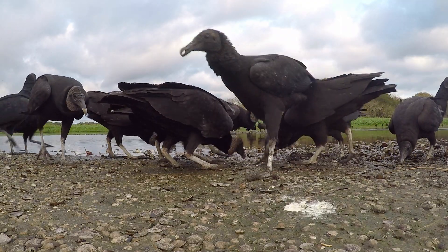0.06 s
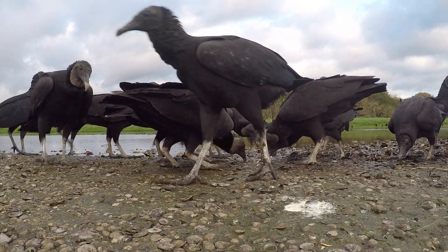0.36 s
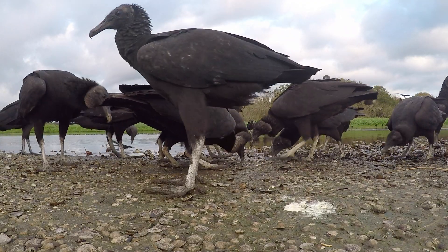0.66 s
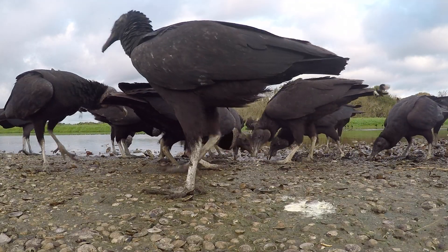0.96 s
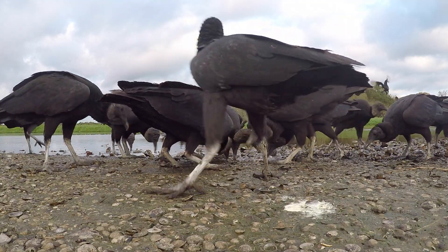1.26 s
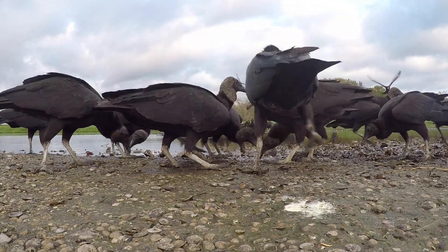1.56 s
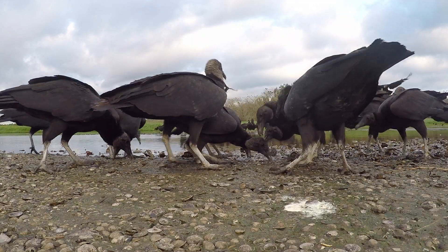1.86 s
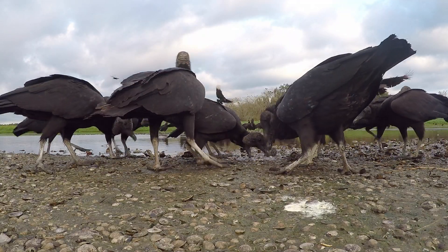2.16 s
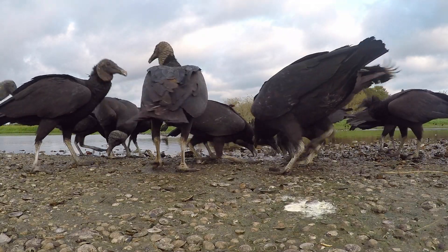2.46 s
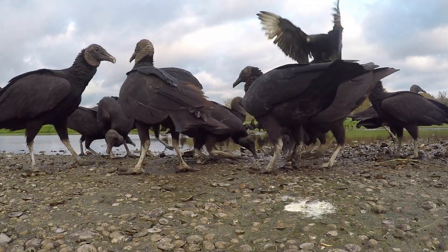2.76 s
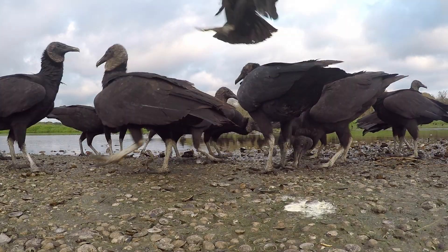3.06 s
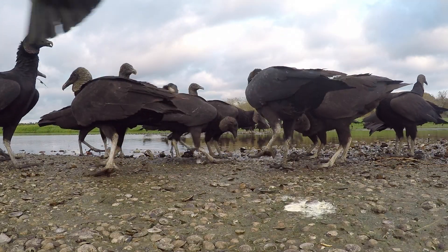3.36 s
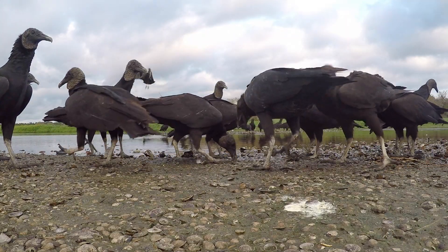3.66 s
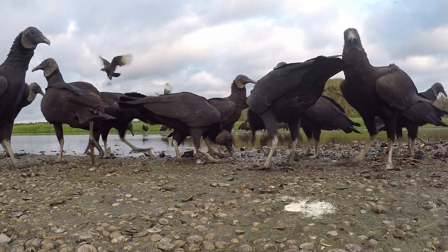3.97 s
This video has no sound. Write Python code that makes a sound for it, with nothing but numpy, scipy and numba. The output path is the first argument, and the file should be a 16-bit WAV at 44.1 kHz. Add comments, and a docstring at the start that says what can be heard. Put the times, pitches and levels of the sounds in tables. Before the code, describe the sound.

A vulture gives one loud, hoarse hiss close by, from about 3.4 seconds to 4. Before that, low wind rumbles while feathers swish, feet scuff in wet grit and beaks tick on pebbles. A bird grunts faintly further off at 0.5 seconds and again from 1 to 2. Around 2.6 to 3.3 seconds, wings rustle overhead and puff air onto the microphone, with sharper stone clicks near 3.

```python
"""A muddy, pebbly shore, where black vultures feed around a small camera on the ground.
Wind rumbles, feathers swish, feet scuff in grit, and beaks and claws tick on stones.
One bird grunts further off, and one flaps overhead, pushing air onto the microphone.
Then a close bird gives one hoarse hiss: fluttering breath makes its windpipe and throat ring."""
import sys
import numpy as np
from scipy import signal
from scipy.fft import rfft, irfft
from scipy.io import wavfile
from scipy.ndimage import uniform_filter1d, map_coordinates
from numba import njit

SR = 44100
rng = np.random.default_rng(int(sys.argv[2]) if len(sys.argv) > 2 else 0)


def wrap_up_sound(samples):
    """Save the sound to the file named by the first command line argument, as 16-bit audio."""
    columns = np.atleast_2d(samples).T
    # keep every value between -1 and 1, then stretch to whole-number steps
    tamed = np.clip(columns, -1, 1)
    steps = np.round(tamed * 32767).astype(np.int16)
    wavfile.write(sys.argv[1], SR, steps)


N = 176400
T = np.arange(N) / SR

# how strong the wind is from low to high pitch: f/Hz, level/dB
WIND_COLOUR = [(12, -5.5), (25, 1.5), (70, 1.5), (120, -6.5), (220, -13.5), (550, -27), (1050, -23.5),
               (1450, -39.5), (2200, -31.5), (2800, -48.5), (4700, -35), (8000, -58), (12500, -49.5),
               (15500, -62)]
# feather swishes and soft footfalls: t/s, length/s, level/dB, f/Hz
SWISHES = [(0.0, 0.083, -35.5, 465), (.6, 0.037, -43, 650), (.8, 0.083, -48.5, 650),
           (1.048, 0.041, -36.5, 550), (1.495, 0.033, -38, 225), (2.665, 0.059, -39, 374),
           (2.73, 0.039, -27, 218), (2.935, 0.053, -39.5, 575), (3.0, 0.038, -32, 295),
           (3.16, 0.14, -36, 490)]
# tone colour of the stony ground: f/Hz, level/dB
STONE_COLOUR = [(150, -22.5), (500, 5.5), (1050, 5.5), (1450, -3.5), (2400, 0), (4600, 2.5), (6700, -2.5),
                (8000, -16), (12000, -16.5), (15500, -31)]
# feet and beaks scuffing in grit: t/s, length/s, level/dB, f/Hz
SCUFFS = [(.05, 0.15, -45, 3850), (.245, 0.049, -45, 4420), (.42, 0.085, -45.5, 4300),
          (.608, 0.036, -34, 3830), (1.215, 0.038, -45.5, 2010), (1.295, 0.048, -45.5, 4650),
          (1.365, 0.024, -37.5, 5030), (1.485, 0.07, -47, 5000), (1.545, 0.032, -35.5, 5450),
          (1.672, 0.05, -42, 5330), (1.727, 0.023, -42, 1350), (1.775, 0.12, -48, 4400),
          (2.065, 0.091, -45, 4300), (2.294, 0.021, -44.5, 4150), (2.42, 0.031, -40.5, 2100),
          (2.459, 0.022, -36.5, 2620), (2.54, 0.041, -37, 3480), (2.585, 0.029, -35, 5730),
          (2.691, 0.016, -27, 5240), (2.726, 0.011, -32, 5100), (2.84, 0.021, -34.5, 4250),
          (2.959, .027, -28, 4560), (2.962, 0.026, -30.5, 2240), (2.987, 0.036, -37, 4800),
          (3.03, 0.026, -31.5, 4400), (3.078, 0.019, -35.5, 4400), (3.139, 0.02, -42, 4930)]
# beaks and claws hitting stones: t/s, level/dB, f/Hz
TICKS = [(.059, -27, 4840), (.174, -23.5, 4830), (.234, -25, 4700), (.266, -29.5, 3560),
         (.331, -28.5, 1940), (.542, -28, 2330), (.5925, -18, 4350), (.652, -26.5, 3640), (.703, -29, 4480),
         (.858, -33, 4570), (1.049, -20.5, 3580), (1.1155, -22.5, 2980), (1.1435, -26, 4760),
         (1.29, -21.5, 4230), (1.307, -23.5, 4450), (1.344, -26.5, 3930), (1.366, -25.5, 2800),
         (1.389, -25, 4460), (1.5, -24, 1040), (1.565, -20, 2390), (1.627, -26, 910), (1.689, -20, 3740),
         (1.7305, -20, 1090), (1.892, -29, 4200), (1.949, -27, 4400), (1.983, -25.5, 5800),
         (2.047, -25, 4860), (2.146, -24, 3500), (2.1675, -25.5, 4270), (2.295, -21.5, 3870),
         (2.463, -22, 2530), (2.4865, -16, 3720), (2.5015, -22, 6140), (2.565, -17.5, 990),
         (2.6215, -18.5, 5700), (2.6965, -22, 4580), (2.9862, -18.5, 6800), (2.9895, -4.5, 4730),
         (3.028, -19, 6350), (3.0328, -14.5, 4200), (3.0455, -14, 4900), (3.141, -18, 960),
         (3.297, -23.5, 1660), (3.612, -8, 2270), (3.76, -9.5, 3950)]
# two distant grunts, one short and rising, one long: t/s, level/dB, f/Hz
GRUNTS = [(.45, -58, 290), (.49, -37.5, 416), (.535, -66, 710), (.98, -70, 337), (1.1, -44, 358),
          (1.43, -41.5, 390), (1.62, -43, 376), (2.05, -48.5, 359), (2.4, -64, 328)]
# sharp, bright spits of mud: t/s, length/s, level/dB, f/Hz
SPITS = [(1.142, 0.0051, -37, 11200), (1.548, 0.035, -51.5, 11200), (3.555, 0.009, -36.5, 11500)]
# short wet squelches: t/s, length/s, level/dB, f/Hz
SQUELCHES = [(1.322, 0.027, -41.5, 1740), (2.238, 0.024, -40.5, 890), (2.828, 0.012, -33.5, 1165),
             (3.08, 0.02, -37, 940), (3.294, 0.013, -35, 1610)]
# feather rustle of the flying bird: t/s, level/dB
RUSTLE = [(2.3, -58.5), (2.6, -47.5), (2.9, -52), (3.02, -43.5), (3.12, -49), (3.19, -41.5), (3.35, -48)]
# puffs of air from wings: t/s, length/s, level/dB
GUSTS = [(2.62, 0.61, -33.5), (3.02, 0.078, -25), (3.13, 0.201, -26), (3.905, 0.2, -19.5)]
# tone colour of those puffs: f/Hz, level/dB
GUST_COLOUR = [(10, -6.5), (25, 0.5), (50, -9), (110, -15), (220, -23), (600, -75)]
# the windpipe ringing in the close hiss: t/s, level/dB, f/Hz
WINDPIPE = [(3.338, -52, 380), (3.36, -36, 400), (3.395, -21, 440), (3.47, -17.5, 470), (3.59, -17, 469),
            (3.66, -21, 432), (3.77, -23, 396), (3.87, -26, 443), (3.945, -29, 385), (3.985, -46, 366)]
# breath through the beak: t/s, level/dB, beak opening (0 narrow, 1 wide)
BREATH = [(3.34, -91.5, 0.1), (3.395, -40, 0), (3.43, -22.5, 0.46), (3.465, -18.5, 0.93), (3.6, -19, 0.96),
          (3.675, -17.5, 0.83), (3.72, -21, 0.36), (3.84, -23.5, 0.27), (3.925, -31, 0.12), (3.985, -60, 0)]
# pitches at which throat and beak ring: f/Hz, width/Hz, level/dB (beak narrow), level/dB (beak wide)
THROAT_BANDS = [(983, 240, -10.5, -14), (1215, 146, -12, -15), (1610, 290, -18, -12),
                (2367, 370, -7, -23.5), (2643, 140, -17, -20.5), (3230, 120, -27, -27.5),
                (3900, 410, -19.5, -12.5), (4700, 660, -7.5, -20), (4900, 620, -19, -2.5),
                (5320, 580, -13.5, -18), (6170, 690, -13, -24), (6700, 420, -23, -20.5)]
# the throat tightens, then slackens: t/s, factor on its pitches
THROAT_TUNING = [(3.41, 0.99), (3.66, 1.005), (3.95, 0.982)]
# tone colour of the hiss between those pitches: f/Hz, level/dB
AIR_COLOUR = [(60, 10.5), (200, 15), (700, -3), (2000, 0), (6800, -28), (7400, -8), (12500, -17),
              (15500, -34)]


def undb(db):
    """Turn decibels into a number to multiply by."""
    return 10 ** (np.asarray(db) / 20)


def unit(x):
    """Scale a signal so that its average size (rms) is 1."""
    return x / np.sqrt(np.mean(x ** 2) + 1e-18)


def noise():
    """White noise for the whole scene."""
    return rng.standard_normal(N)


def curve(rows):
    """Join each column of a table with straight lines over time; the end values hold."""
    rows = np.array(rows, float)
    return [np.interp(T, rows[:, 0], column) for column in rows.T[1:]]


def add(out, start, x):
    """Mix a sound in at its start time, in seconds."""
    i = int(np.clip(start * SR, 0, N))
    out[i:i + len(x)] += x[:N - i]


@njit
def band_pass(x, hz, width):
    """Let through a band of pitches whose centre and width can move."""
    out, band_state, low_state = np.empty(len(x)), 0., 0.
    for i in range(len(x)):
        step, damping = np.tan(np.pi * hz[i] / SR), width[i] / hz[i]
        band = (band_state + step * (x[i] + 1e-18 - low_state)) / (1 + step * (step + damping))
        band_state = 2 * band - band_state
        low_state += 2 * step * band
        out[i] = damping * band
    return out


def resonate(x, hz, width_hz):
    """Make a sound ring near one pitch by filtering it twice."""
    zeros = np.zeros(len(x))
    hz, width_hz = np.clip(hz + zeros, 20, 19000), width_hz + zeros
    return unit(band_pass(band_pass(x, hz, width_hz), hz, width_hz))


def colour(x, points):
    """Shape the lows and highs of a sound to follow a tone colour table."""
    hz, db = np.array(points, float).T
    all_hz = np.arange(N // 2 + 1) * SR / N + 1e-3
    gain = undb(np.interp(np.log(all_hz), np.log(hz), db))
    # these steps make the filter ring after a click, never before it
    cepstrum = irfft(np.log(gain), N)
    cepstrum[1:N // 2] *= 2
    cepstrum[N // 2 + 1:] = 0
    return unit(irfft(rfft(x) * np.exp(rfft(cepstrum)), N))


def wander(per_s):
    """Glide to a new random value per_s times a second."""
    hold = max(int(SR / per_s), 1)
    return unit(uniform_filter1d(noise()[np.arange(N) // hold], hold))


def clicks(per_s, spread_db):
    """Random clicks, many small and a few large."""
    hits = (rng.random(N) < per_s / SR) * np.sign(noise())
    return hits * undb(spread_db * np.minimum(rng.exponential(size=N), 4.5))


def swell(length):
    """A loudness shape that rises quickly and falls more slowly."""
    progress = np.linspace(0, 1, max(int(length * SR), 2), endpoint=False)
    return np.sin(np.pi * progress ** 0.53)


def bursts(rows, source, width_share, unfiltered=0):
    """One swell per row, filtered to a band whose width is a share of its pitch."""
    out = np.zeros(N)
    for k, (start, length, db, hz) in enumerate(rows):
        shape = swell(length)
        piece = np.roll(source, -k * N // len(rows))[:len(shape)]
        band = resonate(piece, hz, width_share * hz)
        add(out, start, undb(db) * shape * unit(band + unfiltered * unit(piece)))
    return out


def steady(x, seconds):
    """Even out the slow swings of a sound, keeping its fine grain."""
    power = uniform_filter1d(x ** 2, max(int(seconds * SR), 2))
    return x / np.sqrt(np.abs(power) + 1e-9)


def wind():
    """Low wind rumble with open-air hiss and a faint, breathy whine."""
    rumble = undb(-37 + 0.79 * wander(per_s=7.9)) * colour(noise(), WIND_COLOUR)
    whine = undb(-73) * resonate(noise(), hz=8490, width_hz=290)
    return rumble + whine


def swishes():
    """Feathers brush and feet land softly: wide, dull puffs of noise."""
    return bursts(SWISHES, noise(), width_share=1.13)


def pebbles(per_s, spread_db, sizes=18, crack_s=0.0015, ring_s=0.0016):
    """Pebbles knock at random: each cracks, then rings briefly at the pitch of its size."""
    out, t = np.zeros(N), T[:SR // 100]
    for hz in np.geomspace(1500, 13000, sizes):
        crack = unit(rng.standard_normal(len(t)) * np.exp(-t / crack_s))
        ring = unit(np.sin(2 * np.pi * hz * t) * np.exp(-t / ring_s))
        out += signal.fftconvolve(clicks(per_s / sizes, spread_db), crack + ring)[:N]
    return colour(out, STONE_COLOUR)


def pecking(surge_db=3):
    """The rest of the flock pecks at pebbles: a faint, uneven patter."""
    patter = pebbles(per_s=700, spread_db=4.5)
    return undb(-53.5) * unit(patter * undb(surge_db * wander(per_s=24.34)))


def scuffs():
    """Feet and beaks push grit, so many tiny stones knock at once."""
    grit = pebbles(per_s=3200, spread_db=4)
    return bursts(SCUFFS, grit, width_share=0.59, unfiltered=1)


def ticks(rise_s=0.00015, ring_s=0.0011, crack_s=0.0015, tail_s=0.007):
    """A beak or claw hits a stone: a crack, a brief ring and a faint gritty tail."""
    out, t = np.zeros(N), T[:N // len(TICKS)]
    grit = colour(noise(), STONE_COLOUR)
    grit_fade = undb(-16.5) * np.exp(-t / crack_s) + undb(-21.5) * np.exp(-t / tail_s)
    for k, (start, db, hz) in enumerate(TICKS):
        ring = np.sin(2 * np.pi * hz * t) * np.exp(-t / ring_s) * (1 - np.exp(-t / rise_s))
        crack = grit_fade * grit[k * len(t):(k + 1) * len(t)]
        add(out, start, undb(db) * (ring + crack))
    return out


def grunts():
    """A bird grunts further off: mostly the low ring of its windpipe carries."""
    db, hz = curve(GRUNTS)
    windpipe = resonate(noise(), hz, width_hz=155)
    upper_band = undb(-12) * resonate(noise(), hz=960, width_hz=480)
    return undb(db) * (windpipe + upper_band)


def mud():
    """Wet mud spits and squelches: short bursts of noise, the spits high, the squelches lower."""
    return bursts(SPITS, noise(), width_share=0.39) + bursts(SQUELCHES, noise(), width_share=0.21)


def wings():
    """A flying bird's feathers rustle, and wings push puffs of air onto the microphone."""
    crackle = colour(clicks(per_s=8300, spread_db=4.7), STONE_COLOUR)
    out = undb(curve(RUSTLE)[0]) * crackle
    air = colour(noise(), GUST_COLOUR)
    for k, (start, length, db) in enumerate(GUSTS):
        shape = swell(length)
        add(out, start, undb(db) * shape * unit(air[k * SR:k * SR + len(shape)]))
    return out


def hiss(flutter_db=2, drift_share=0.0075, round_trip_s=0.0022):
    """Breath rings the windpipe and flutters through the throat; opening the beak changes the tone."""
    pipe_db, pipe_hz = curve(WINDPIPE)
    breath_db, opening = curve(BREATH)
    opening = np.clip(opening, 0, 1)
    tuning = curve(THROAT_TUNING)[0]
    pipe = resonate(noise(), pipe_hz, width_hz=137 + 68 * opening)  # purest with the beak narrow
    pipe = steady(pipe, seconds=0.027)  # the breath pressure holds even
    flutter = unit(undb(flutter_db * wander(per_s=240)))
    throat = np.zeros(N)
    for hz, width_hz, narrow_db, wide_db in THROAT_BANDS:
        gain = undb(narrow_db + (wide_db - narrow_db) * opening)
        drift = 1 + drift_share * wander(per_s=22)
        throat += gain * resonate(noise() * flutter, hz * tuning * drift, width_hz)
    air = colour(noise() * flutter, AIR_COLOUR)
    # the sound runs along the throat and back as a very quick echo
    echo = map_coordinates(air, [(T - round_trip_s / tuning) * SR], order=3, mode="mirror")
    rush = undb(-17) * unit(air + undb(-5.5) * echo)
    return undb(pipe_db) * pipe + undb(breath_db) * (throat + rush)


def scene():
    """All the sounds meet at one microphone in the open."""
    mix = wind() + swishes() + pecking() + scuffs() + ticks() + grunts() + mud() + wings() + hiss()
    return mix[None]


def record(dry, top_hz=15600):
    """The camera cuts off the very highest sounds."""
    return signal.sosfilt(signal.ellip(8, .2, 70, top_hz, fs=SR, output="sos"), dry)


dry = scene()
out = record(dry)
wrap_up_sound(out)
```